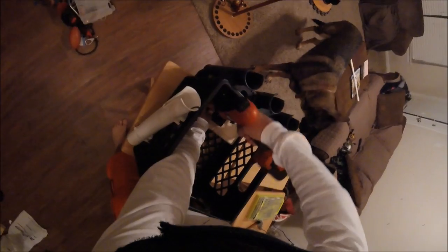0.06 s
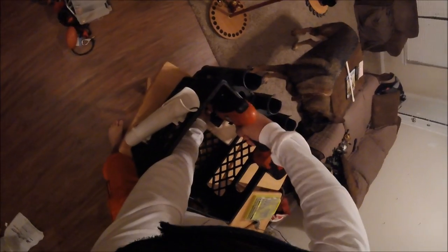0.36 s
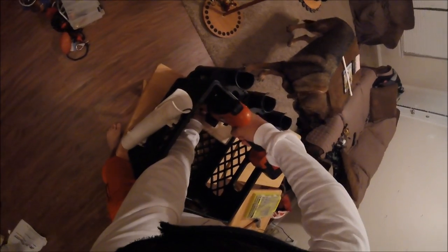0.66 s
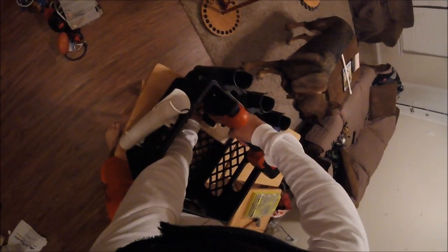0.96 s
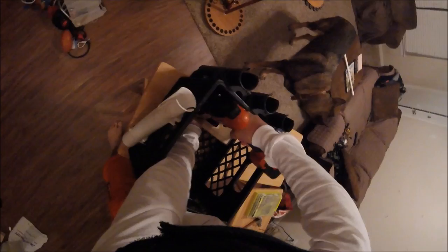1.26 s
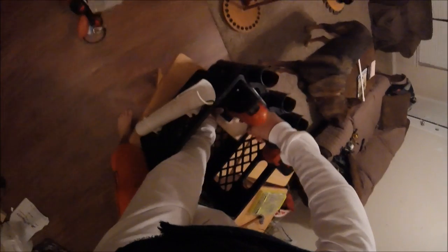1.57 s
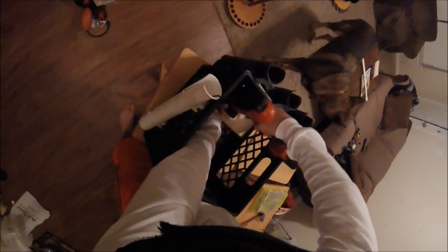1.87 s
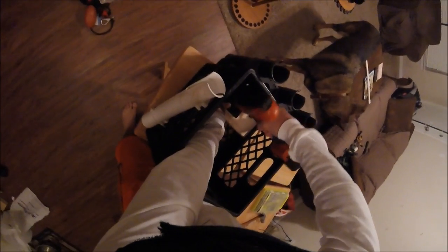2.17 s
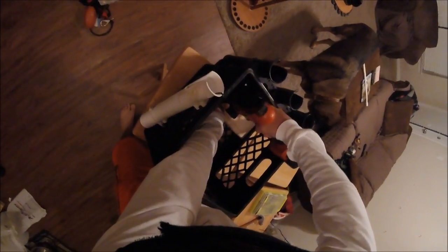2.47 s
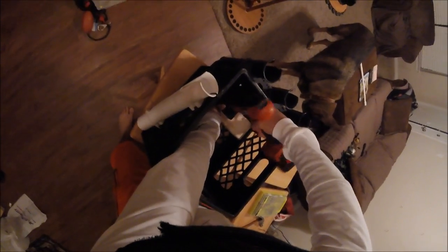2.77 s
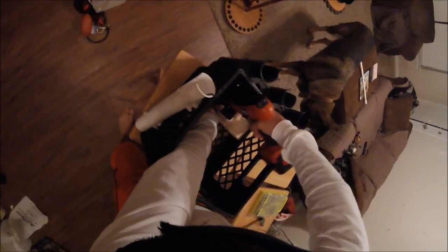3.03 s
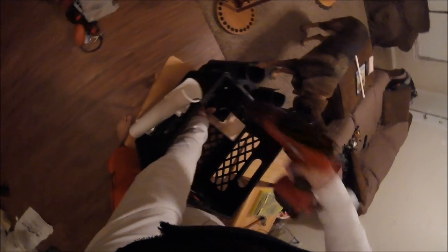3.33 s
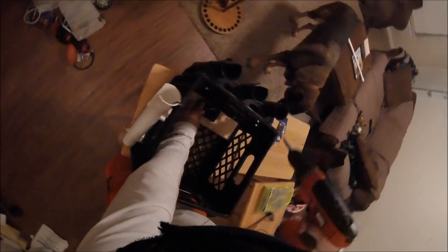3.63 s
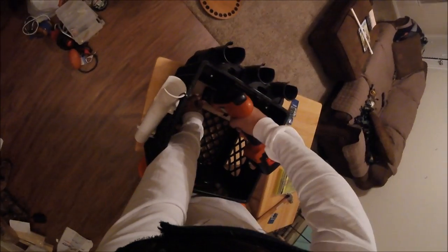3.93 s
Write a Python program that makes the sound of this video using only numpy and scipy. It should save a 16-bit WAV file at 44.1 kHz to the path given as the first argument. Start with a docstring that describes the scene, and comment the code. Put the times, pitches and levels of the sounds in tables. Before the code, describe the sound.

A cordless drill spins up and drives a screw into a plastic crate, its whine sinking under load. The bit keeps slipping with sharp knocks, then chatters and stops. Faint handling ticks surround it, heard from above in a room.

```python
"""A living room: a cordless drill spins up and drives a screw into a plastic crate.
The motor whistles, then the gears growl, whine and rattle, sinking in pitch under load.
The bit slips again and again, knocking the crate and letting the motor race, until it chatters
and scrapes over the screw head and the trigger is released. Faint handling ticks and
sleeve rustles come before and after, over a low room hum."""
import sys
import numpy as np
from scipy import signal
from scipy.fft import rfft, irfft
from scipy.io import wavfile
from scipy.ndimage import map_coordinates

SR = 44100
rng = np.random.default_rng(int(sys.argv[2]) if len(sys.argv) > 2 else 0)


def wav_out(sig):
    """Save sig, one row per channel (or a flat mono array), as 16-bit PCM at SR to the path in sys.argv[1]."""
    wavfile.write(sys.argv[1], SR, np.round(np.clip(np.atleast_2d(sig).T, -1, 1) * 32767).astype(np.int16))


N = 176400

# Room tone: freq_hz, level_db
AIR_SPECTRUM = [(20, -4), (70, -3), (103, -13.5), (238, -22), (620, -26), (1100, -28.5), (1800, -30),
                (2600, -33), (4100, -41.5), (7000, -37), (9100, -42), (12500, -58.5), (14500, -73)]
# Decay of the room's tail: freq_hz, t60_s
ROOM = [(150, 0.41), (800, 0.48), (2500, 0.39), (6000, 0.36), (12000, 0.53)]
# Light ticks of the tool in the hand: start_s, tick_db, thud_db
HANDLING_TICKS = [(0.109, -52.5, -39.5), (0.127, -56, -46), (0.544, -53.5, -66), (.873, -38, -31),
                  (1.9834, -28.5, -39.5), (2.745, -25.5, -43), (3.171, -44, -37), (3.473, -52.5, -73),
                  (3.535, -58, -78), (3.904, -58.5, -70)]
# Colour of a tick: freq_hz, level_db
TICK_SPECTRUM = [(200, -1), (1500, 6.5), (2500, 8.5), (3800, -2.5), (5300, 4), (6800, -19), (10000, -34),
                 (14000, -36)]
# The crate's modes; low ones thump, high ones clack: pitch_hz, level_db, t60_s
CRATE_MODES = [(162, -20, .22), (206, -7, .036), (290, -9, .03), (364, -23, .14), (380, -.5, .02),
               (660, -4, .027), (780, -2.5, .025), (879, -8, .027), (1030, -9, .024)]
# Sleeve and hand rubbing on the tool: start_s, length_s, level_db
RUBS = [(0.165, 0.25, -65), (3.194, 0.31, -68.5)]
# Colour of a rub: freq_hz, level_db
RUB_SPECTRUM = [(300, 0), (1400, -10.5), (2400, 1), (3900, -11), (4650, 3), (5200, -6), (6000, -3),
                (7000, -35), (12000, -27)]
# Hiss around the motor's whistle: freq_hz, level_db
WHISTLE_HISS = [(500, -9), (1800, -1), (2250, 10), (2800, -7), (4100, -14), (4600, 7), (6000, -7),
                (6800, -33), (12000, -47)]
# Motor speed without the slips: time_s, turns_per_s
MOTOR_SPEED = [(.68, 130), (.76, 235), (.85, 343), (.9, 364), (1.03, 372), (1.16, 365), (1.29, 347),
               (1.45, 329), (1.64, 308), (1.79, 297), (1.95, 288), (2.17, 276), (2.4, 272), (2.59, 268),
               (2.7, 266), (2.78, 235), (3.09, 255), (3.2, 130)]
# The drill's effort, a fader on its gear and motor sounds: time_s, gain_db
DRILL_EFFORT = [(.675, -69), (.69, -49), (.74, -9), (.79, -1.5), (.87, -0.5), (1.05, -0.5), (1.28, -1),
                (1.6, -2.5), (2.0, -0.5), (2.4, -0.5), (2.75, -0.5), (2.83, 0.5), (3.09, 1), (3.125, -40),
                (3.18, -33), (3.22, -50)]
# Colour of the rattle and buzz, running free: freq_hz, level_db
FREE_SPECTRUM = [(60, -39), (170, -8.5), (245, -7.5), (340, -9.5), (520, -13.5), (700, -3.5), (1100, -4),
                 (1250, -0.5), (1600, -7), (2100, -3.5), (2550, -13.5), (2880, -7.5), (3100, -14),
                 (4100, -15), (4500, -12), (4900, -9), (5500, -9), (6100, -11.5), (6600, -24),
                 (9500, -31.5), (12500, -52)]
# Colour of the rattle under load: freq_hz, level_db
LOADED_SPECTRUM = [(60, 0.5), (170, -2), (380, 6.5), (540, -14.5), (700, 3), (1000, 6.5), (1350, 4.5),
                   (1600, 0), (2150, 1.5), (2400, -4.5), (2850, 1), (3250, -3.5), (4000, -8), (4700, -2),
                   (5600, -4), (6100, -7), (6600, -20), (7400, -18), (9800, -33), (12500, -78)]
# Shaft tones: shaft_multiple, free_db, loaded_db
SHAFT_PARTIALS = [(3.5, -44, -44), (4, -38.5, -74), (8, -53, -56), (12, -54, -72.5), (16, -46.5, -84)]
# Gear tones, one row per harmonic of the mesh: free_db, loaded_db
MESH_HARMONICS = [(-39.5, -42), (-55, -40.5), (-55, -47.5), (-71, -61)]
# Housing resonances that the tones sweep through: freq_hz, gain_db
HOUSING_EQ = [(600, -3), (730, -16), (950, 2), (1550, -7.5), (1790, 3), (2100, -2), (2450, 0), (3000, 3),
              (3500, 0), (4200, -0.5), (5100, 8), (5550, 8.5), (6000, -9), (6700, -10)]
# The bit slips and knocks the crate: hit_s, thump_db, clack_db, crack_db, ring_time_factor
BIT_SLIPS = [(1.332, -9.5, -10, -18.5, 1.2), (1.5262, -10, -11.5, -19, 1), (1.665, -10, -12, -19.5, 1.2),
             (1.8185, -7.5, -11, -19.5, 1), (1.9836, -7, -9.5, -18.5, .8), (2.2, -11, -12, -22.5, 1.3),
             (2.469, -15.5, -22.5, -35, 2), (2.611, -12, -14.5, -20.5, 1.5), (2.8066, -12, -21, -22.5, 1.6),
             (2.8478, -11.5, -17.5, -27, 1.5), (2.881, -21, -15.5, -20, 1.2), (2.911, -14.5, -14, -25, 1.4),
             (2.95, -19.5, -25, -24, 1), (2.9851, -9.5, -12, -22.5, 1.5), (3.023, -17.5, -18, -24, 1),
             (3.057, -24.5, -15, -31, 1.2), (3.089, -19, -18.5, -26.5, 1.2)]
# Crack of the bit landing: freq_hz, level_db
CRACK_SPECTRUM = [(100, -8), (400, -0.5), (1100, -13.5), (1700, -10), (2600, -13), (3800, -20.5),
                  (5600, -12), (6600, -30.5), (10000, -40.5), (14000, -97)]
# The crate's ribs shuddering in many close modes: freq_hz, level_db
SHUDDER_SPECTRUM = [(60, -30), (120, -15), (165, 2.5), (220, -3.5), (330, 2.5), (520, -13.5), (750, 5.5),
                    (1100, -12), (1800, -43.5), (5000, -91)]
# The loose bit scraping over the screw head: freq_hz, level_db
SCRAPE_SPECTRUM = [(50, -31), (85, 0.5), (120, -18.5), (200, -17), (280, -11.5), (380, 0), (540, -24),
                   (680, 1.5), (880, -17), (1200, -35), (2000, -30), (4000, -31), (5300, -18), (6500, -37),
                   (12000, -64.5)]

BITE_S, FULL_LOAD_S, CHATTER_S = 1.18, 1.95, 2.8  # the screw bites, full load, the bit loses its seat
GEAR_MESH, PLANET_RATIO = 4.93, 0.3  # cycles per shaft turn
FREE_TURNS_PER_S, SETTLE_S = 335, .04  # a slip pulls the motor toward this speed, then it settles
TONE_WAVER_DB = 2
WALL_S = .009  # delay of the room's tail
DRILL_ROOM_DB, TONE_ROOM_DB, KNOCK_ROOM_DB = -4.5, -7, -5.5  # reverb sends


def amp(db):
    """Decibels to gain."""
    return 10 ** (np.asarray(db) / 20)


def unit(x):
    """Scale to rms 1."""
    return x / np.sqrt(np.mean(x ** 2) + 1e-20)


def along(points, hz):
    """Read (Hz, value) points on a log axis."""
    f, v = np.transpose(points)
    return np.interp(np.log(hz + 1), np.log(f + 1), v)


def clock():
    """The time of each sample."""
    return np.arange(N) / SR


def curve(rows):
    """Join (s, value) points by straight lines."""
    return np.interp(clock(), *np.transpose(rows))


def wobble(rate):
    """A smooth random curve, rate knots a second."""
    return map_coordinates(rng.standard_normal(int(N * rate / SR) + 4), [clock() * rate])


def coloured(x, spectrum):
    """Give x a spectrum and rms 1."""
    return unit(irfft(rfft(x) * amp(along(spectrum, np.fft.rfftfreq(N, 1 / SR))), N))


def noise(spectrum):
    """Noise of rms 1 with a spectrum."""
    return coloured(rng.standard_normal(N), spectrum)


def fade(t, t60):
    """Exponential decay."""
    return np.exp(-np.log(1000) * t / t60)


def add(track, s, sound):
    """Mix a sound into a track at time s."""
    part = track[max(0, round(s * SR)):][:len(sound)]
    part += sound[:len(part)]


def room(x, wet_db):
    """The direct sound and the room's tail, which starts at the nearest wall."""
    hz, t, z = signal.stft(rng.standard_normal(SR * 3 // 5), SR, nperseg=256)
    tail = signal.istft(z * fade(t, along(ROOM, hz)[:, None]), SR, nperseg=256)[1]
    tail = np.pad(tail / np.linalg.norm(tail), (round(abs(WALL_S) * SR), 0))
    return x + amp(wet_db) * signal.fftconvolve(x, tail)[:len(x)]


def room_tone(air_db=-56.5, hum_hz=49.3, hum_db=-58):
    """A bed of still air and a low, wavering hum."""
    hum = np.sqrt(2) * np.sin(2 * np.pi * hum_hz * clock() + .3 * wobble(2.3))
    return amp(air_db) * noise(AIR_SPECTRUM) + amp(hum_db + 2.3 * wobble(4.2)) * hum


def burst(t, spectrum, t60_s, attack_s=0.00069):
    """A quickly dying puff of noise."""
    return noise(spectrum)[:len(t)] * fade(t, t60_s) * (1 - np.exp(-(t / attack_s) ** 2))


def crate_ring(t, thump_db, clack_db, ring=1, clack_from_hz=550, detune=.025, attack_s=0.00068):
    """The struck crate rings in its modes, a little different in level and pitch at each blow."""
    modes = np.zeros(len(t))
    for hz, db, t60 in CRATE_MODES:
        level = amp(db + (thump_db if hz < clack_from_hz else clack_db) + rng.standard_normal())
        pitch = hz * (1 + detune * rng.standard_normal())
        modes += level * fade(t, ring * t60) * np.sin(2 * np.pi * pitch * t)
    return modes * (1 - np.exp(-(t / attack_s) ** 2))


def handling():
    """Light ticks of the tool, some with a soft thud of the crate."""
    out, t = np.zeros(N), np.arange(SR // 2) / SR
    for s, tick_db, thud_db in HANDLING_TICKS:
        tick = amp(tick_db) * burst(t, TICK_SPECTRUM, t60_s=0.043)
        add(out, s, tick + crate_ring(t, thud_db, thud_db))
    return room(out, wet_db=-6)


def ramp(start, end):
    """Rise from 0 to 1 between two times."""
    return np.clip((clock() - start) / (end - start), 0, 1)


def sleeve_rustle(rough_db=2):
    """Sleeve and hand brush the tool in faint, uneven swells."""
    swells = sum(amp(db) * np.sin(np.pi * ramp(s, s + length)) for s, length, db in RUBS)
    return swells * amp(rough_db * wobble(80)) * noise(RUB_SPECTRUM)


def pitched_noise(cycles, width_hz):
    """A rough, narrow band of noise around a moving pitch."""
    phase = 2 * np.pi * cycles
    return unit(wobble(width_hz) * np.cos(phase) + wobble(width_hz) * np.sin(phase))


def motor_whistle(start_s=0.682, length_s=0.0556, pitch_hz=4580, rise_hz=533):
    """A light pull on the trigger makes the motor whistle, rising as it begins to turn."""
    end_s = start_s + length_s
    envelope = ramp(start_s, start_s + .0042) * (1 - ramp(end_s - .0082, end_s))
    pitch = pitch_hz + rise_hz * ramp(start_s, end_s) ** 2
    tone = pitched_noise(np.cumsum(pitch) / SR, width_hz=550)
    hiss = amp(2) * noise(WHISTLE_HISS)
    return room(amp(-52.5) * envelope * (tone + hiss), DRILL_ROOM_DB)


def gear_growl(turns, singing):
    """While spinning up, the gears growl around the mesh pitch."""
    return amp(-35.5) * (1 - singing) * pitched_noise(GEAR_MESH * turns, width_hz=250)


def gear_rattle(turns, load, pulse_depth=0.24, roughness=0.26):
    """The clatter of the teeth pulses once a turn and darkens under load."""
    pulsing = unit((1 + pulse_depth * np.cos(2 * np.pi * turns)) * np.exp(roughness * wobble(700)))
    teeth = pulsing * rng.standard_normal(N)
    free = np.sqrt(1 - load) * coloured(teeth, FREE_SPECTRUM)
    loaded = np.sqrt(load) * coloured(teeth, LOADED_SPECTRUM)
    return amp(-37.5) * (free + loaded)


def gear_whine(turns, speed, load, free_blur=.35, loaded_blur=.22, full_blur_hz=3500):
    """Shaft and mesh tones sing through the housing; loose teeth blur the highs, less so under load."""
    mesh_tones = [(GEAR_MESH * k, *levels) for k, levels in enumerate(MESH_HARMONICS, 1)]
    out = np.zeros(N)
    for multiple, free_db, loaded_db in list(SHAFT_PARTIALS) + mesh_tones:
        pitch, cycles = multiple * speed, multiple * turns
        # the planet gears beat against the mesh
        beat = 1 + .1 * load * np.sin(2 * np.pi * PLANET_RATIO * turns + wobble(25))
        db = free_db + (loaded_db - free_db) * load
        db += along(HOUSING_EQ, pitch) + TONE_WAVER_DB * wobble(90)
        blur = loaded_blur * load + free_blur * (1 - load) * np.minimum(pitch / full_blur_hz, 1) ** 2
        clean = beat * np.sqrt(2) * np.sin(2 * np.pi * cycles)
        rough = pitched_noise(cycles, width_hz=160)
        out += amp(db) * (np.sqrt(1 - blur) * clean + np.sqrt(blur) * rough)
    return out


def commutator_buzz(turns, load, top_harmonic=17):
    """The commutator buzzes in weak harmonics of the shaft speed, fading out under load."""
    harmonics = sum(amp(TONE_WAVER_DB * wobble(30.2)) * np.sin(2 * np.pi * (k * turns + rng.random()))
                    for k in range(2, top_harmonic + 1))
    return amp(-44.5) * np.sqrt(1 - load) * coloured(harmonics, FREE_SPECTRUM)


def gearbox_drone(turns, load, start_s=.872, attack_s=0.0022):
    """The gearbox catches and drones at twice the shaft speed until the load damps it."""
    level = ramp(start_s, start_s + attack_s) * amp(-42 - 14.5 * load + TONE_WAVER_DB * wobble(60))
    return level * np.sqrt(2) * np.sin(2 * np.pi * 2 * turns)


def motor_race(lead_s=.011, rise_s=.006):
    """Envelope of the revs: each slip frees the motor, then the screw drags it down again."""
    ages = [np.maximum(clock() - s + lead_s, 0) for s, *_ in BIT_SLIPS]
    return np.max([(1 - np.exp(-t / rise_s)) * np.exp(-t / SETTLE_S) for t in ages], axis=0)


def gear_grip(depth=.7, width_s=.008):
    """A gain that ducks as the gears briefly lose their drive at each slip."""
    return 1 - depth * np.max([np.exp(-((clock() - s) / width_s) ** 2) for s, *_ in BIT_SLIPS], axis=0)


def drill(flutter=0.0018, race_db=5, strain_db=3, chatter_db=-9):
    """One motor speed drives growl, rattle, whine, buzz and drone; the tones flare as it races."""
    race, load, effort = motor_race(), ramp(BITE_S, FULL_LOAD_S), amp(curve(DRILL_EFFORT))
    speed = curve(MOTOR_SPEED)
    speed += .85 * race * (FREE_TURNS_PER_S - speed)
    turns = np.cumsum(speed * (1 + flutter * wobble(160))) / SR
    singing = ramp(0.717, 0.906)  # the gears only sing once they are up to speed
    unseated = ramp(CHATTER_S - SETTLE_S / 2, CHATTER_S)
    strain = np.interp(speed, [269, 270], [1, 0]) * (1 - unseated)  # slow gears strain louder
    tone_gain = singing * amp(race_db * race + strain_db * strain + chatter_db * unseated) * gear_grip()
    tones = tone_gain * (gear_whine(turns, speed, load) + commutator_buzz(turns, load))
    growl = gear_growl(turns, singing)
    tonal = room(effort * (tones + gearbox_drone(turns, load)), TONE_ROOM_DB)
    gritty = room(effort * (gear_rattle(turns, load) + growl), DRILL_ROOM_DB)
    return tonal + gritty


def slip_knocks(lead_s=.0048, rebound_s=.005, low_cut_hz=125):
    """The bit climbs out, lands and rebounds: three cracks that ring the crate, whose ribs shudder."""
    out, t = np.zeros(N), np.arange(SR * 2 // 3) / SR
    for s, thump_db, clack_db, crack_db, ring in BIT_SLIPS:
        knock = np.zeros(len(t))
        lead, rebound = np.abs(1 + .1 * rng.standard_normal(2)) * [lead_s, rebound_s]
        for delay, db in [(0, -8.5), (lead, 0), (lead + rebound, -12.5)]:
            body = crate_ring(t, thump_db, clack_db, ring)
            crack = amp(crack_db) * burst(t, CRACK_SPECTRUM, t60_s=0.031)
            add(knock, delay, amp(db) * (body + crack))
        shudder = amp(thump_db - 17) * burst(t, SHUDDER_SPECTRUM, t60_s=.24, attack_s=.008)
        add(knock, lead, shudder)
        add(out, s - lead, room(knock, KNOCK_ROOM_DB))
    return signal.sosfilt(signal.butter(2, low_cut_hz, 'highpass', fs=SR, output='sos'), out)


def bit_scrape(peak_s=3.09, release_s=0.071, roughness=0.14):
    """Out of its seat, the bit grinds ever harder and shakes the crate."""
    grains = coloured(np.exp(roughness * wobble(200)) * rng.standard_normal(N), SCRAPE_SPECTRUM)
    envelope = np.sqrt(ramp(CHATTER_S, peak_s)) * (1 - ramp(peak_s, peak_s + release_s))
    return room(amp(-34) * envelope * grains, KNOCK_ROOM_DB)


def scene():
    """The mono mix, heard from above the work."""
    work = drill() + slip_knocks() + bit_scrape()
    return (work + handling() + motor_whistle() + sleeve_rustle() + room_tone())[None]


def record(dry, top_hz=14000):
    """A brick-wall high cut takes the very top off the mix."""
    return irfft(rfft(dry) * (np.fft.rfftfreq(N, 1 / SR) < top_hz), N)


dry = scene()
out = record(dry)
wav_out(out)
```